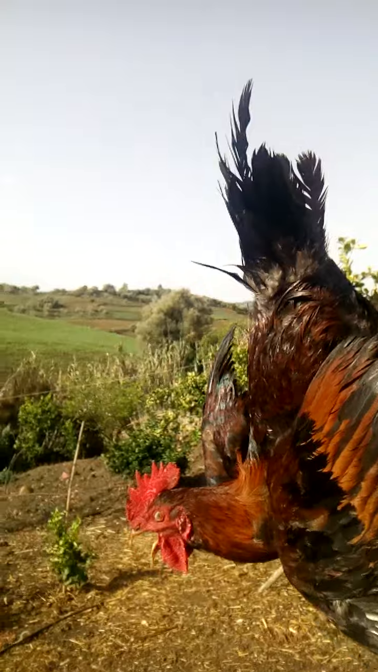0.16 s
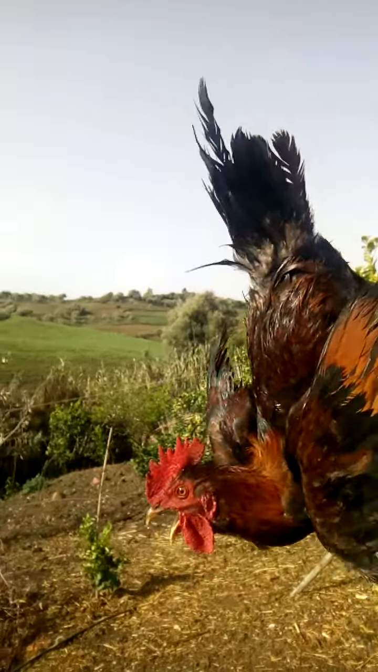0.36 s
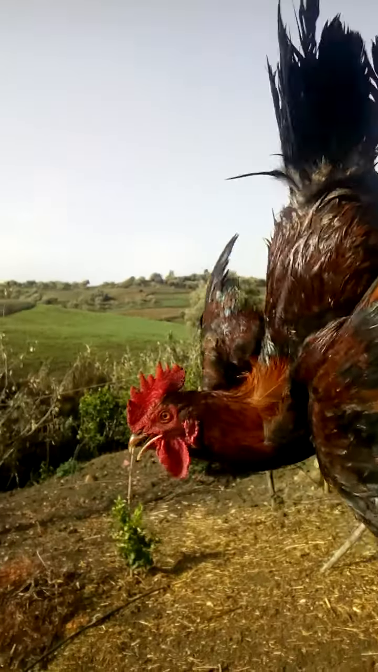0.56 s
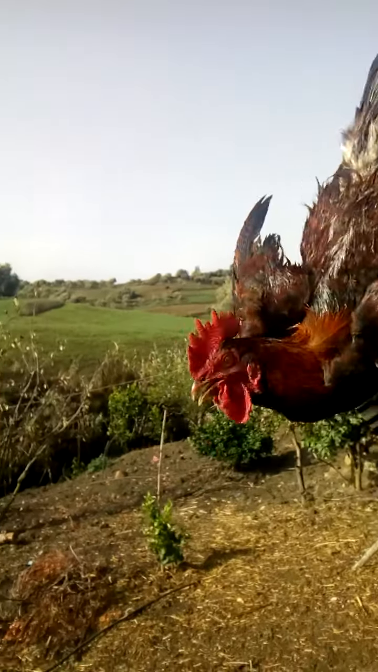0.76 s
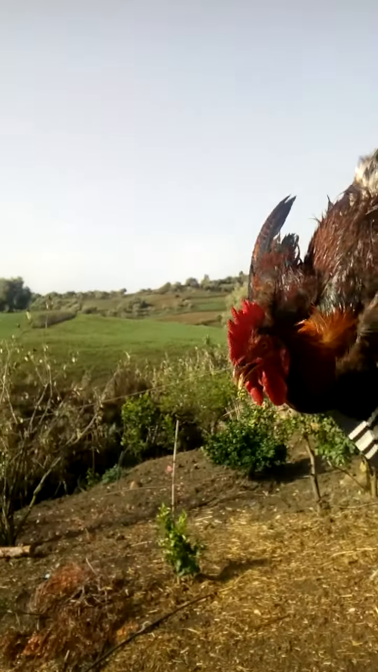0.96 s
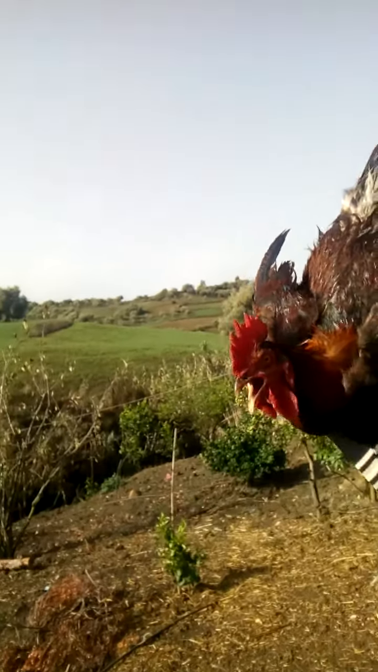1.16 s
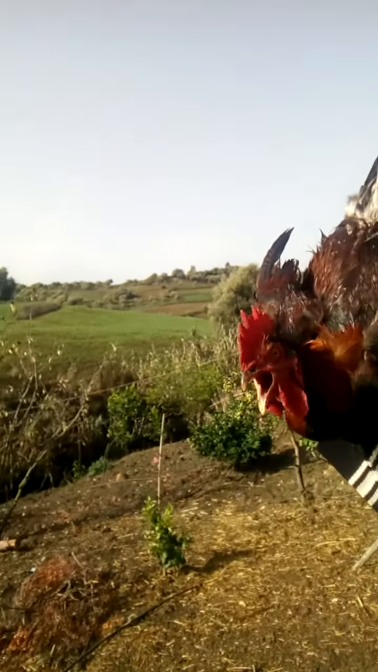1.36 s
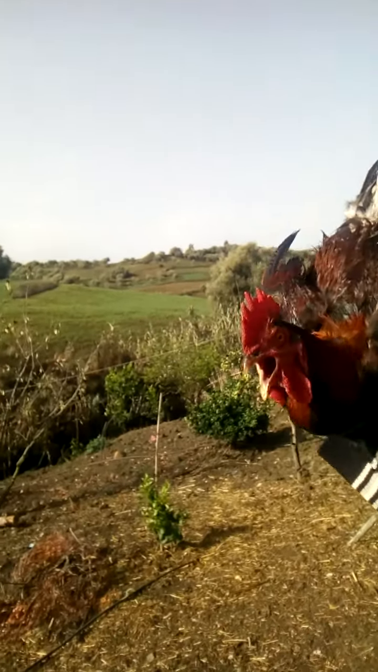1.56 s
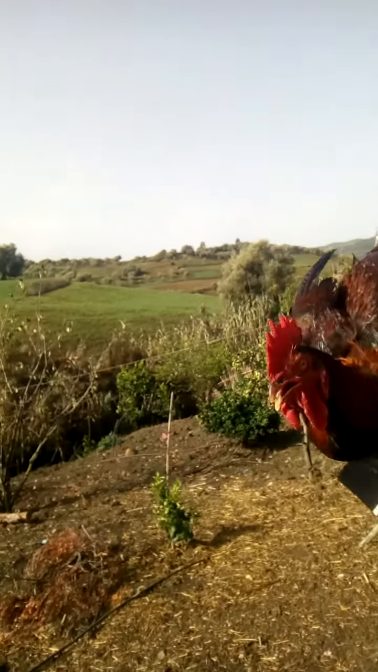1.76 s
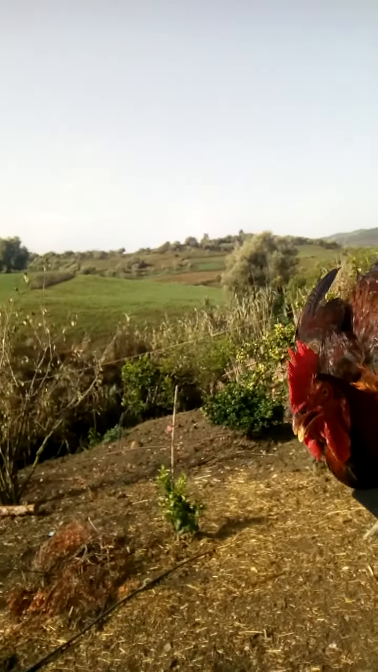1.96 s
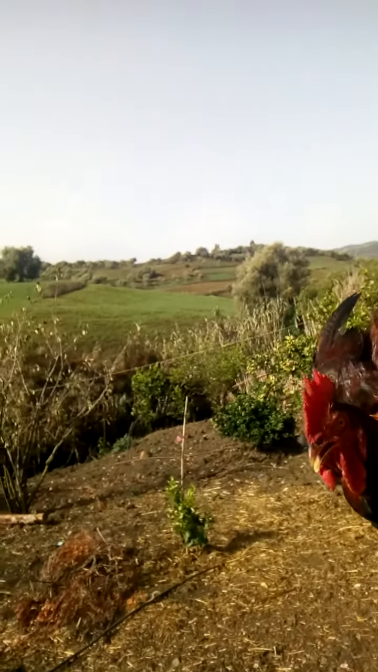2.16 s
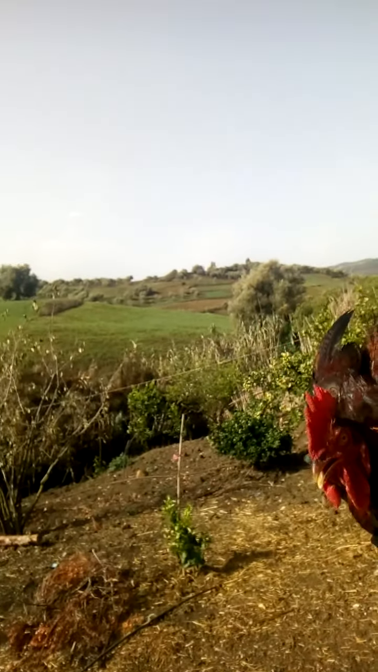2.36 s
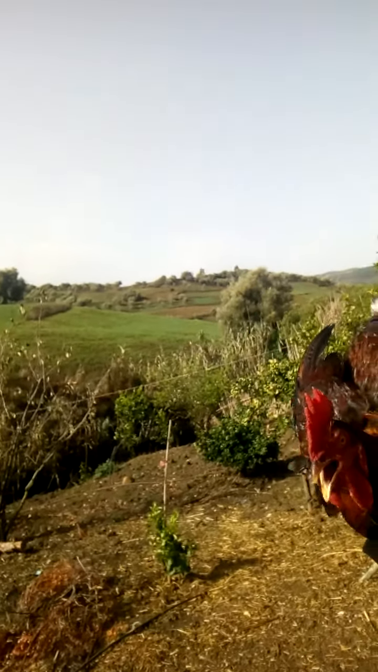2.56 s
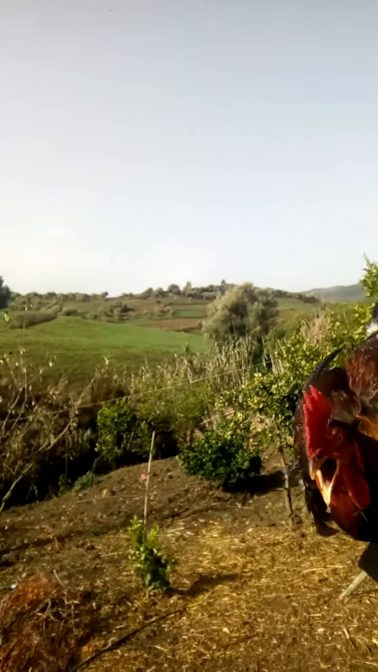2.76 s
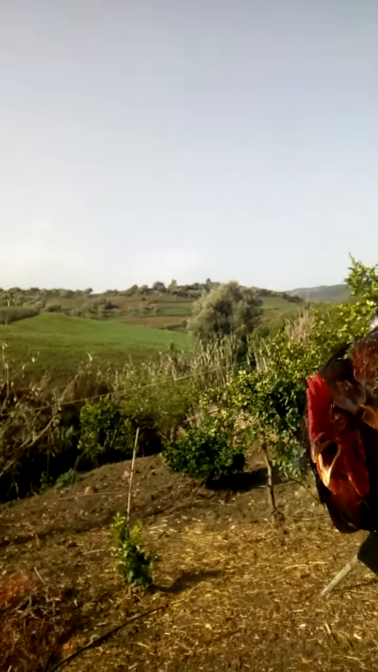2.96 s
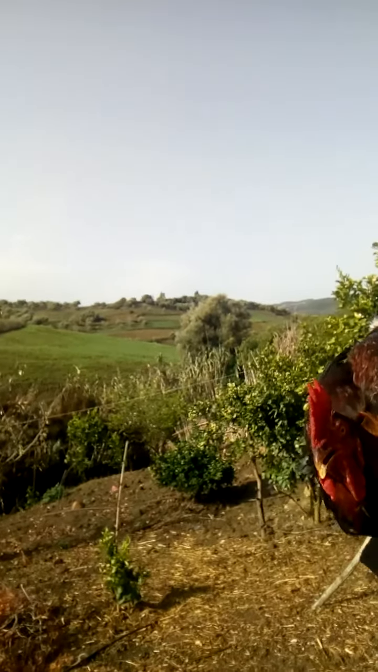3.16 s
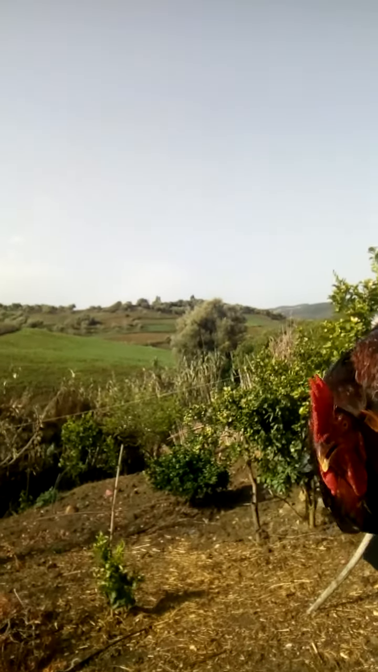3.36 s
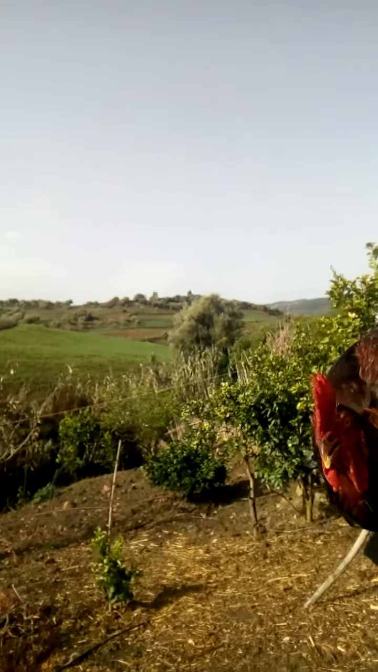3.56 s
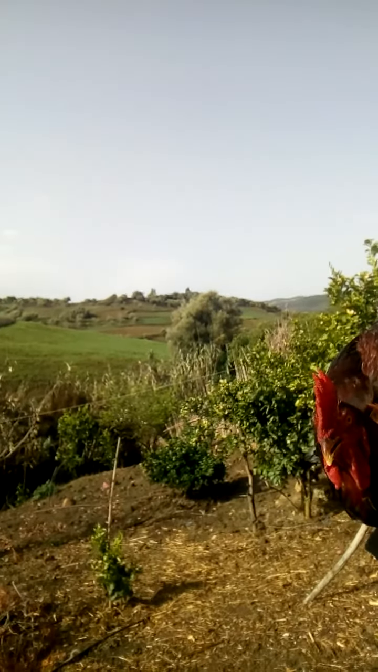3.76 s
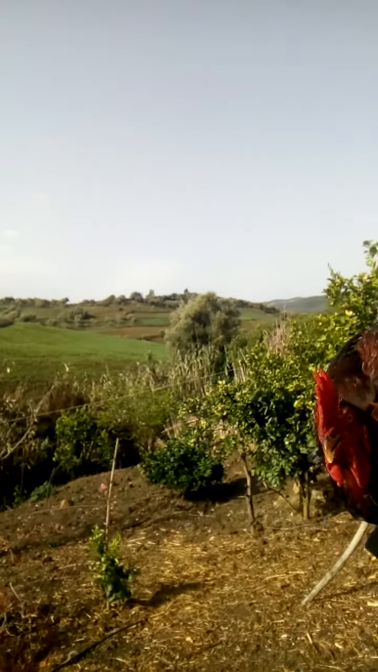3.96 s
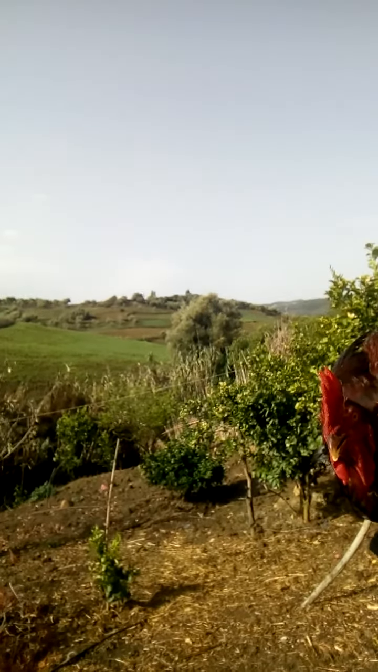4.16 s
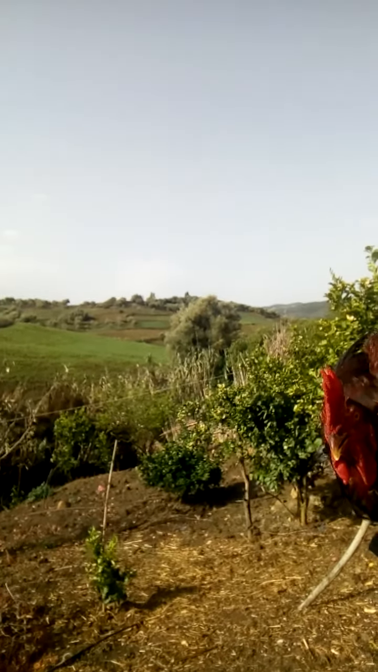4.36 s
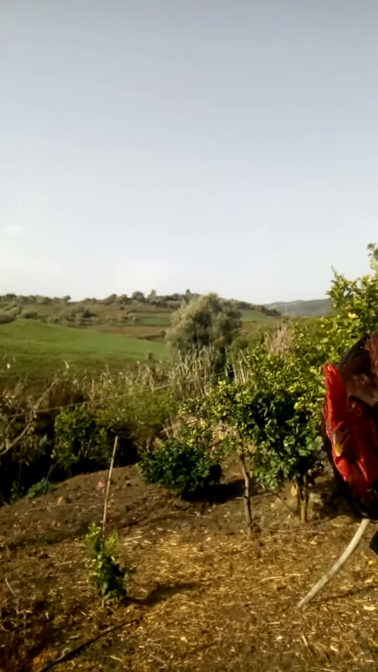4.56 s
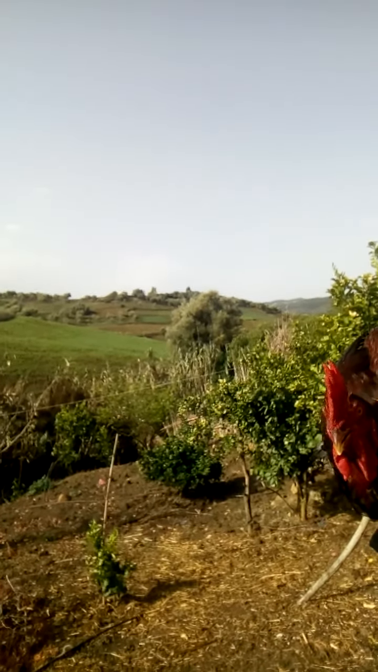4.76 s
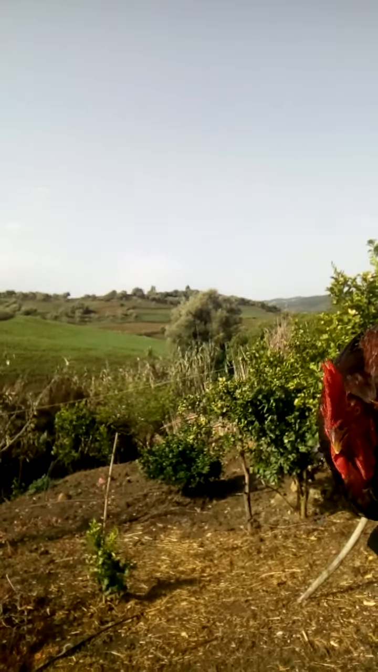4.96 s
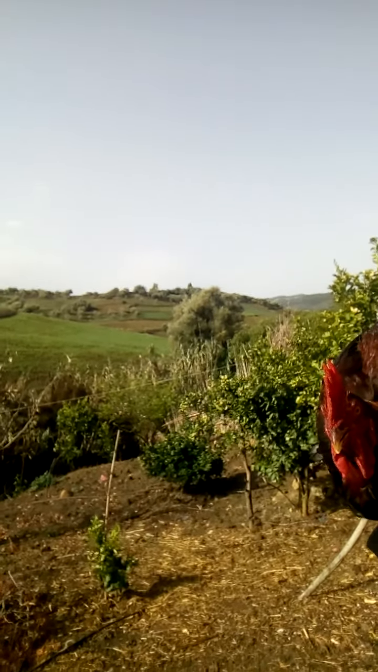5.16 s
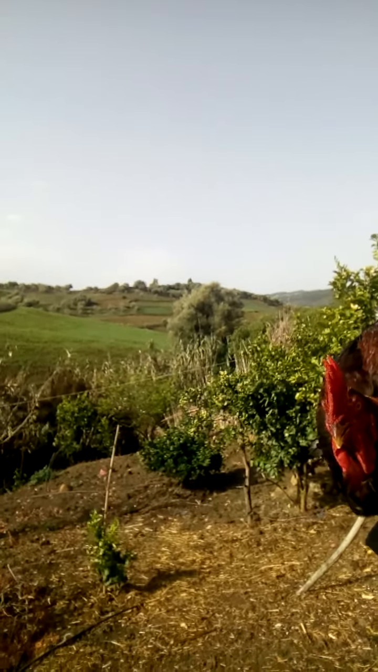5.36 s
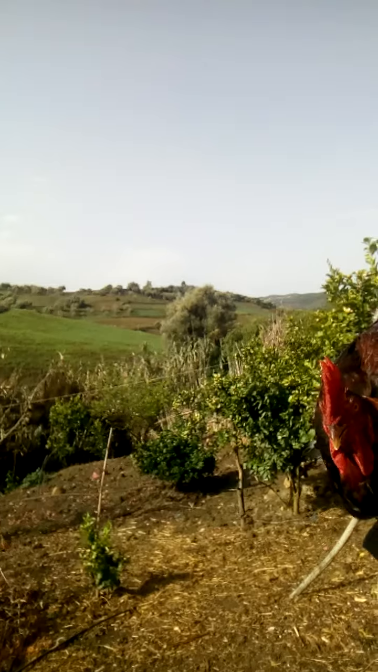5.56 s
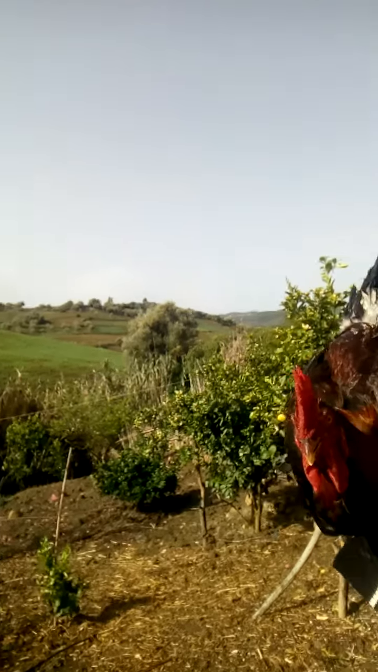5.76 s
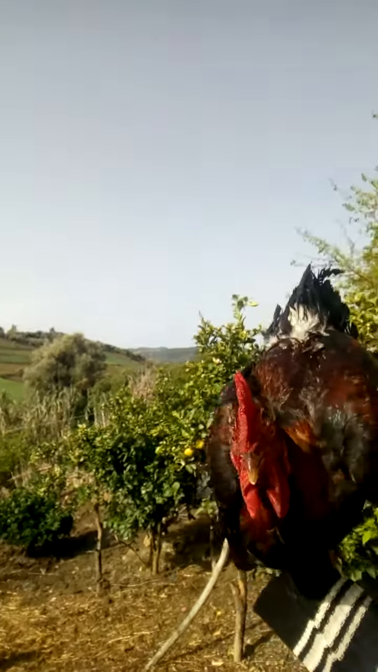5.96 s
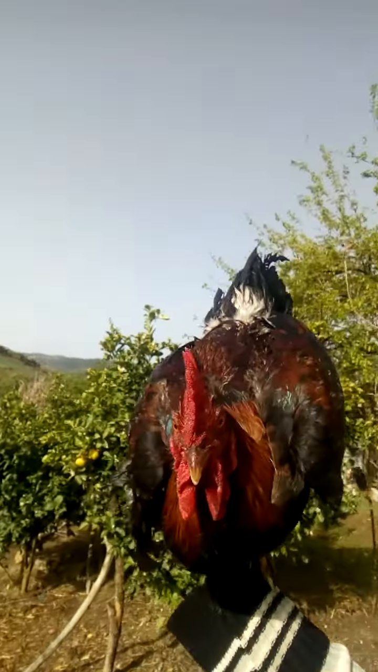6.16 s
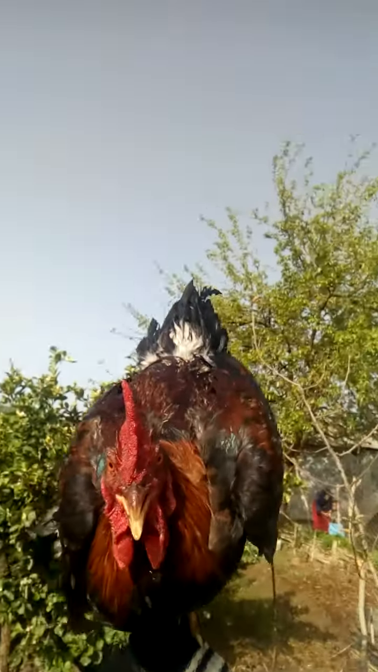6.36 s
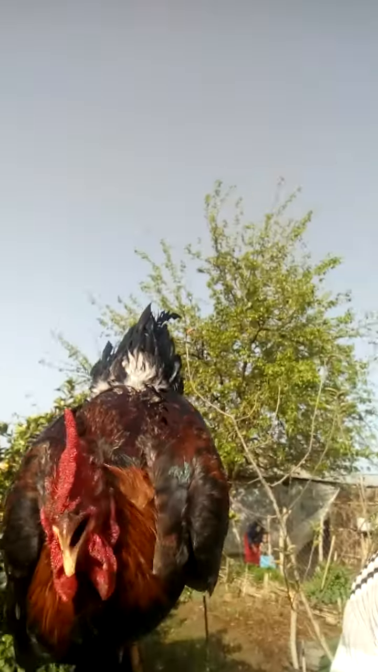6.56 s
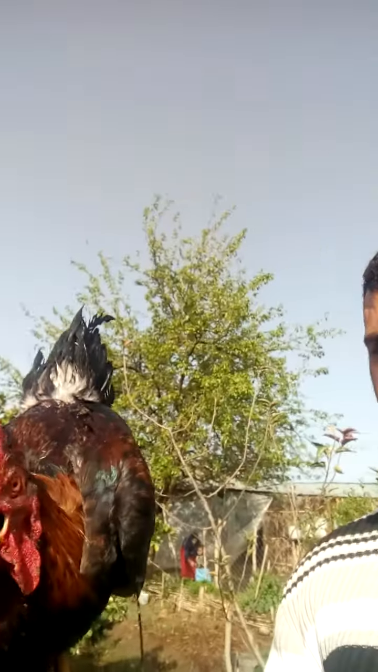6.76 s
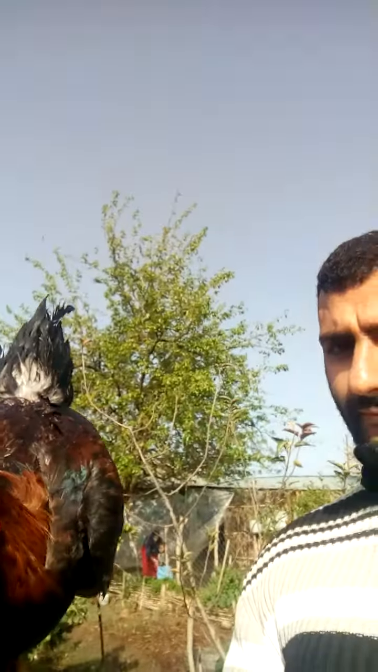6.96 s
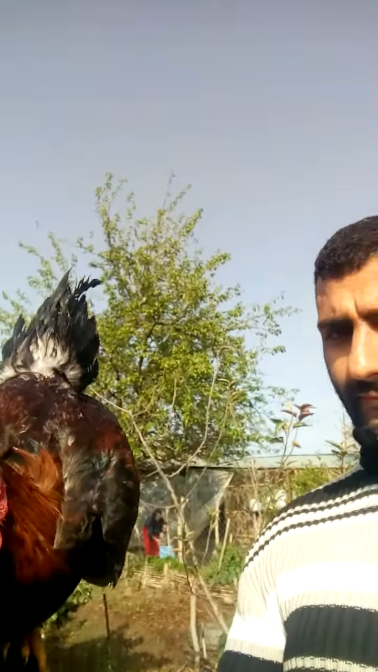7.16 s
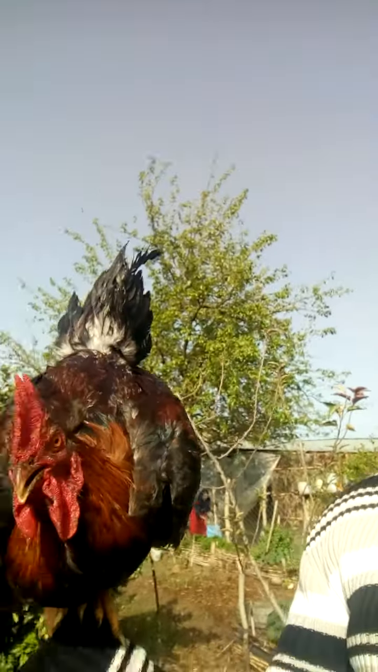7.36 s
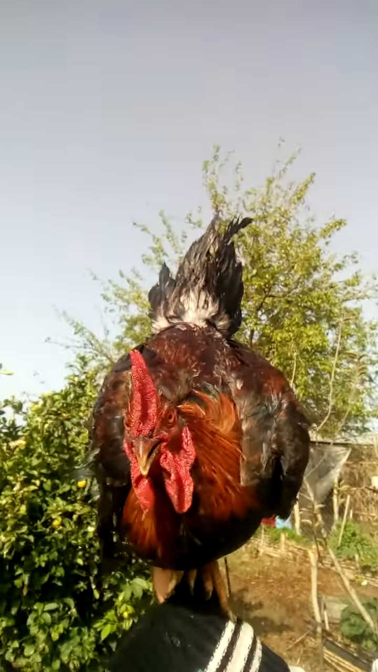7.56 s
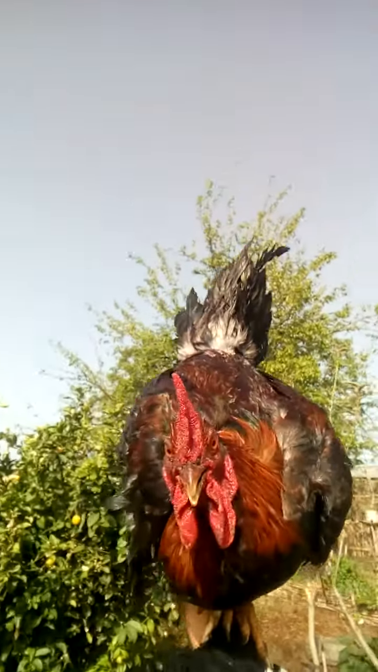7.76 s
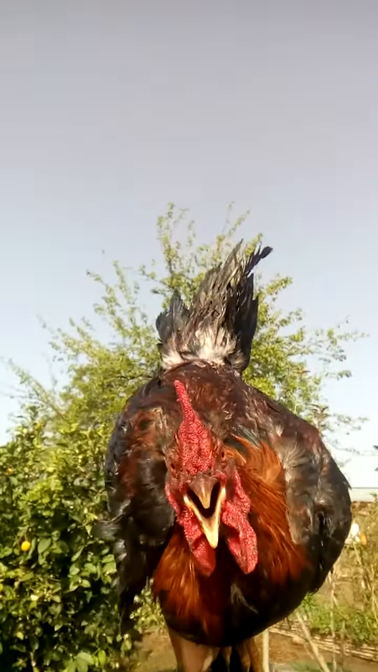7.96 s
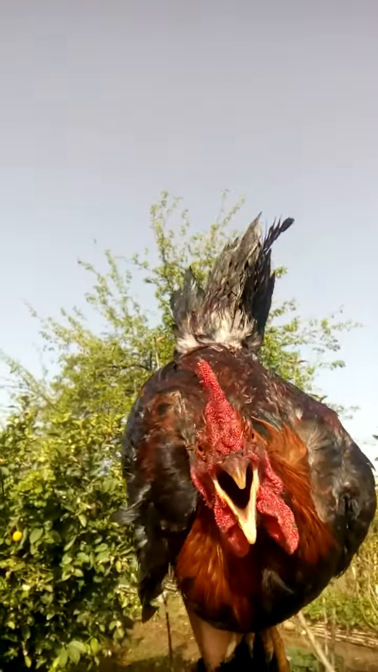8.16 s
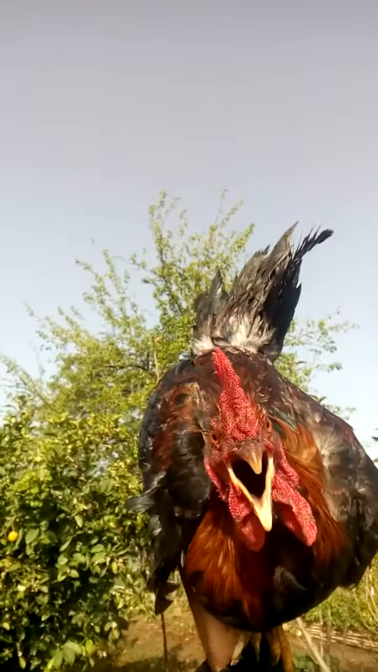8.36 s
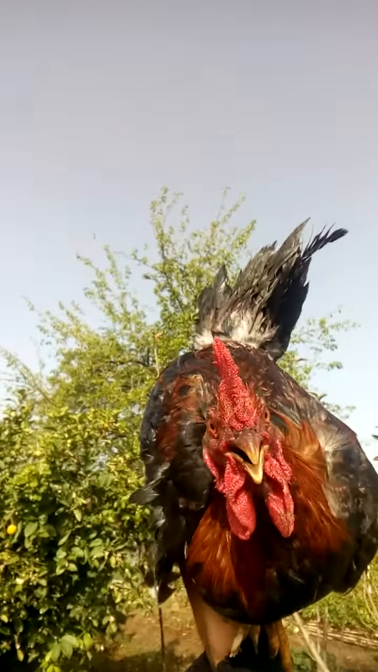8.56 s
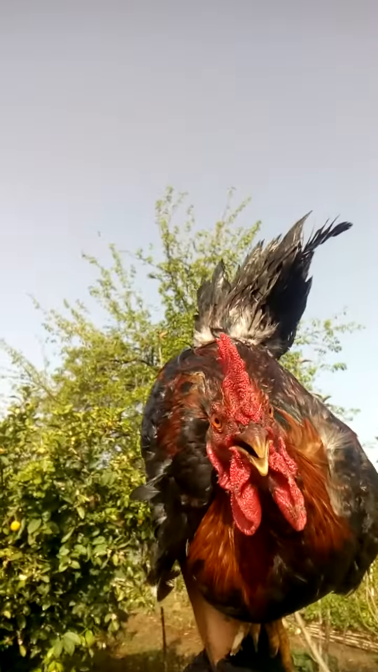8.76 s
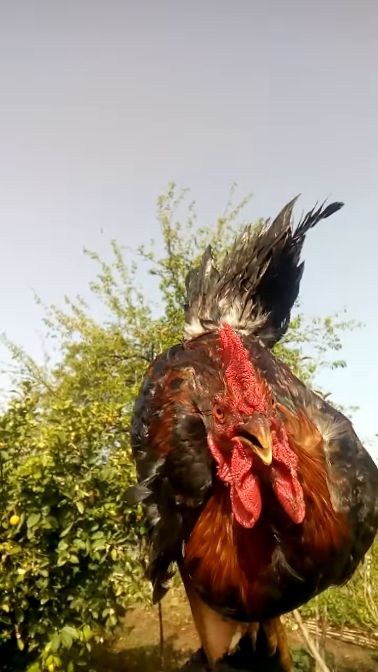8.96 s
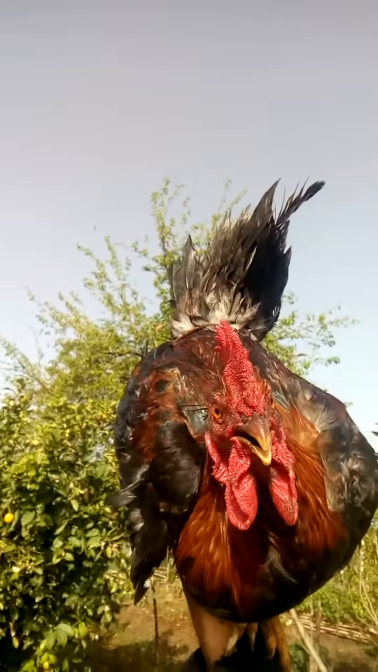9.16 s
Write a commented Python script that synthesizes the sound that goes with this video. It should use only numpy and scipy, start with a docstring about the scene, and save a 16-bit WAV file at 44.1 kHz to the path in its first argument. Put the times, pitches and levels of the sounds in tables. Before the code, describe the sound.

A rooster squawks loudly, close to the microphone, in quiet open country with almost no echo. Each squawk lasts about half a second, starting as a sputtering rasp, opening into a rough scream and settling on a clear note that sags into a croak. The first three come at the very start, at 1.1 and at 2.4 seconds. Soft gasps and faint feather rustles fall between calls, and a thin whine follows at 3.6 seconds. A small songbird twitters in the background on and off from 2.3 to 5.5 seconds. Another rooster crows very faintly far away from 4.5 to 5.8 seconds, followed by a light, dry double snap. The close rooster squawks again at 6.3 seconds, gasps, whines softly at 7.5, and gives a last squawk from 7.9 to 8.5 seconds. Faint outdoor air noise continues throughout.

```python
"""Open field: a rooster, held in a hand close by, squawks five times.
Membrane pulses drive throat, mouth and beak resonances; each squawk starts as a sputtering rasp,
opens into a rough scream, locks into a clear note and sags. Between squawks he gasps, whines softly
and rustles his feathers. Behind him: faint air noise, a twittering songbird, a distant crow from
another rooster and one dry double snap."""
import sys
import numpy as np
from scipy import signal
from scipy.fft import rfft, irfft, next_fast_len
from scipy.io import wavfile
from scipy.ndimage import uniform_filter1d, minimum_filter1d, map_coordinates

SR = 44100
rng = np.random.default_rng(int(sys.argv[2]) if len(sys.argv) > 2 else 0)


def to_wav(sig):
    """Store sig (one row per channel, or 1-D mono) as 16-bit WAV at the path in sys.argv[1].

    Samples outside -1..1 are clipped; the rate is SR.
    """
    pcm = np.clip(np.atleast_2d(sig), -1, 1) * 32767
    pcm = np.round(pcm).astype(np.int16)
    wavfile.write(sys.argv[1], SR, pcm.T)  # frames by channels


N = 410130
T = np.arange(N) / SR
GRID_HZ = np.fft.rfftfreq(4096, 1 / SR)
CROAK_ONSET_S = 0.017


def amp(db):
    """Decibels to gain."""
    return 10 ** (np.asarray(db) / 20)


def unit(x):
    """x at rms 1."""
    return x / np.sqrt(np.mean(x ** 2) + 1e-20)


def steady(x, window_s):
    """x with its running rms held at 1."""
    window = signal.windows.hann(int(window_s * SR) | 1)
    power = np.abs(signal.fftconvolve(x ** 2, window / window.sum(), "same"))
    return x / np.sqrt(power + 1e-4 * np.mean(x ** 2))


def along(points, hz):
    """Interpolate (f/Hz, value) points on a log frequency axis."""
    points_hz, values = np.transpose(points)
    return np.interp(np.log(hz + 1), np.log(points_hz), values)


def ramp(t, centre, width):
    """Smooth step from 0 to 1."""
    return .5 + .5 * np.sin(np.pi * np.clip((t - centre) / width, -.5, .5))


def bump(t, centre_s, half_s):
    """Gaussian of height 1."""
    return np.exp(-((t - centre_s) / half_s) ** 2)


def wobble(t, rate_hz):
    """Smooth random curve, rate_hz knots a second."""
    knot = (t - t[0]) * rate_hz
    return map_coordinates(rng.standard_normal(int(knot[-1]) + 4), [knot])


def resonances(modes):
    """Gain of steep-sided resonances: f/Hz, half width/Hz, level/dB."""
    return sum(amp(db) / (1 + ((GRID_HZ - hz) / width_hz) ** 2) for hz, width_hz, db in modes)


def colour(x, gain):
    """x through the minimum-phase filter with this gain."""
    cepstrum = irfft(np.log(np.maximum(gain, 1e-6)))
    half = len(cepstrum) // 2
    cepstrum[1:half] *= 2
    cepstrum[half + 1:] = 0
    return signal.fftconvolve(x, irfft(np.exp(rfft(cepstrum))))[:len(x)]


def noise(gain):
    """Coloured noise of rms 1."""
    return unit(colour(rng.standard_normal(N), gain))


def pulses(at, sizes, length):
    """Band-limited pulses at fractional sample positions."""
    index = np.floor(at)[:, None].astype(int) + np.arange(-7, 9)
    offset = index - at[:, None]
    shape = np.sinc(offset) * np.cos(np.pi * offset / 16) ** 2
    inside = (index >= 0) & (index < length)
    return np.bincount(index[inside], (sizes[:, None] * shape)[inside], length)


def ring(x, hz, width_hz):
    """x through a resonance that follows the curve hz."""
    carrier = np.exp(2j * np.pi * np.cumsum(hz) / SR)
    pole = np.exp(-2 * np.pi * width_hz / SR)
    return 2 * np.real(carrier * signal.lfilter([1 - pole], [1, -pole], x / carrier))


def allpass(x, hz, width_hz):
    """Delays sound near hz, which spreads each pulse."""
    pole = np.exp(-2 * np.pi * width_hz / SR)
    a = np.array([1, -2 * pole * np.cos(2 * np.pi * hz / SR), pole ** 2])
    return signal.lfilter(a[::-1], a, x)


def air(level_db=-65):
    """Faint, slightly wavering outdoor noise."""
    # spectrum: f/Hz, level/dB
    spectrum = [(15, -48.5), (25, -18), (137, -6), (291, -12), (333, -12), (812, -18.5), (881, -19),
                (1090, -21.5), (2260, -23.5), (5520, -18), (8050, -40.5), (15800, -36)]
    return amp(level_db + 1.1 * wobble(T, 11)) * noise(amp(along(spectrum, GRID_HZ)))


def field_echo(x, delay_s=0.0072):
    """Trees and walls scatter a thin tail back."""
    # tail decay: f/Hz, t60/s
    decay = [(200, 0.4), (1000, 0.33), (3200, 0.5), (5500, 0.26), (9000, 0.76)]
    # initial tail spectrum: f/Hz, level/dB
    spectrum = [(200, -5.5), (1000, 1.5), (2500, -7), (4000, -4.5), (5500, 4.5), (8000, -6), (15000, -15)]
    hz, t, bins = signal.stft(rng.standard_normal(SR), SR, nperseg=256)
    bins = bins * amp(along(spectrum, hz)[:, None] - 60 * t / along(decay, hz)[:, None])
    tail = signal.istft(bins, SR, nperseg=256)[1]
    return signal.fftconvolve(x, np.pad(tail / np.linalg.norm(tail), (int(delay_s * SR), 0)))[:N]


def foliage(x, decay_s=0.0078):
    """Leaves and ground smear a sound with many faint early reflections."""
    t = T[:SR // 10]
    scatter = rng.standard_normal(len(t)) * np.exp(-t / decay_s)
    return signal.fftconvolve(x, scatter / np.linalg.norm(scatter))[:N]


def far_crow(blur_hz=22, sag_hz_per_s=140, fade_db_per_s=9.5):
    """Only a distant rooster's strongest overtone arrives, blurred; each syllable sinks and fades."""
    # start/s, end/s, f/Hz, level/dB
    syllables = [(4.53, 4.61, 1660, -69), (4.67, 4.74, 1690, -68), (4.77, 5.82, 1818, -71.5)]
    out = np.zeros(N)
    for start_s, end_s, hz, db in syllables:
        age_s = np.clip(T - start_s, 0, end_s - start_s)
        phase = 2 * np.pi * np.cumsum(hz - sag_hz_per_s * age_s + blur_hz * wobble(T, 90)) / SR
        gate = ramp(T, start_s, 0.039) * (1 - ramp(T, end_s, 0.052))
        out += amp(db - fade_db_per_s * age_s + 2.2 * wobble(T, 44)) * gate * np.sin(phase)
    return out


def songbird(chip_period_s=.0634, chip_s=0.029):
    """Twitters and down-slurs; every note flicks to a turning pitch and slides away."""
    # a whistle, then chips: whistle/s, last chip/s, first chip f/Hz, whistle/dB, chip/dB
    twitters = [(2.276, 2.408, 5990, -61, -49.5), (3.654, 3.844, 6120, -47.5, -40.5),
                (5.073, 5.455, 6200, -63, -40)]
    # down-slurs: t/s, level/dB
    slurs = [(2.313, -46.5), (4.398, -42), (4.69, -63.5)]
    # note shapes: length/s, start/Hz, turn/Hz, end/Hz
    whistle = (0.018, 4400, 6900, 6780)
    slur = (0.057, 3600, 5550, 3000)
    lead_in = (.042, 4300, 4720, 5250)
    notes = []
    for at_s, last_s, first_hz, whistle_db, chip_db in twitters:
        notes.append((at_s, whistle_db, *whistle))
        for k in range(round((last_s - at_s) / chip_period_s)):
            hz = first_hz * (1 - 0.015 * k)
            db = chip_db - 1.2 * k + 3 * rng.standard_normal()
            notes.append((at_s + (k + 1) * chip_period_s, db, chip_s, .69 * hz, hz, .92 * hz))
    for at_s, db in slurs:
        notes += [(at_s - lead_in[0], db - 7.5, *lead_in), (at_s, db, *slur)]
    out = np.zeros(N)
    for at_s, db, length_s, start_hz, turn_hz, end_hz in notes:
        progress = np.arange(int(length_s * SR)) / (length_s * SR)
        flick_hz = (start_hz - turn_hz) * np.clip(1 - progress / 0.34, 0, 1) ** 2
        slide_hz = (end_hz - turn_hz) * ramp(progress, .6, 0.9)
        hz = (turn_hz + flick_hz + slide_hz) * (1 + 0.024 * wobble(progress * length_s, 900))
        note = amp(db) * np.sin(np.pi * progress) * np.sin(2 * np.pi * np.cumsum(hz) / SR)
        out[int(at_s * SR):][:len(note)] += note
    return out


def snaps(gain_db=-3, max_t60_s=.12):
    """Two dry cracks in quick succession."""
    # t/s, relative level/dB, t60 before the cap/s
    bursts = [(5.837, -30.5, 0.064), (5.855, -35.5, 0.41)]
    # f/Hz, level/dB
    spectrum = [(120, -44), (200, -10.5), (268, -11.5), (345, -46.5), (515, -23.5), (690, -26), (842, -25),
                (2850, -11), (3120, -6), (4100, -12), (5300, -0.5), (9140, -41), (15500, -44)]
    decay = sum(amp(db - 60 * np.abs(T - at_s) / min(t60_s, max_t60_s)) * (T >= at_s)
                for at_s, db, t60_s in bursts)
    return amp(gain_db) * decay * noise(amp(along(spectrum, GRID_HZ)))


def rustles():
    """Feathers slide over the hand."""
    # t/s, half length/s, level/dB
    slides = [(0.903, 0.097, -58.5), (2.075, 0.063, -60), (6.115, 0.022, -60.5), (7.141, 0.02, -56.5)]
    # f/Hz, level/dB
    spectrum = [(500, -32.5), (2500, -11), (3300, -3.5), (5500, 5.5), (6400, -2), (7500, -21), (15000, -33)]
    swell = sum(amp(db) * bump(T, at_s, half_s) for at_s, half_s, db in slides)
    return swell * unit(noise(amp(along(spectrum, GRID_HZ))) * amp(3 * wobble(T, 280)))


def gasps():
    """Quick gulps of air sound the rooster's windpipe."""
    # t/s, half length/s, level/dB, lowest resonance/Hz
    gulps = [(0.679, 0.023, -48.5, 896), (0.939, 0.027, -44, 863), (3.26, 0.021, -45, 863),
             (3.502, 0.024, -49.5, 874), (7.057, 0.023, -52.5, 850), (7.35, 0.02, -54, 781)]
    # modes: ratio to lowest resonance, half width/Hz, level/dB
    windpipe = [(1, 59.9, 3), (1.52, 79.7, -3.5), (2.04, 100.1, -6.5)]
    out = np.zeros(N)
    for at_s, half_s, db, hz in gulps:
        pipe = resonances([(hz * ratio, width_hz, mode_db) for ratio, width_hz, mode_db in windpipe])
        out += amp(db) * np.exp(-np.abs((T - at_s) / half_s) ** 3) * noise(pipe)
    return out


def whines(sag_s=0.032, fade_db_per_s=10.5, flutter_db=2):
    """A thin note through a nearly shut beak creeps up, then sags and roughens as the air runs out."""
    # start/s, end/s, start pitch/Hz, top pitch/Hz, level/dB
    notes = [(3.602, 3.895, 509.7, 556.6, -40), (7.5, 7.8, 498.3, 552, -43.5)]
    # one list per note: harmonic number, level/dB
    spectra = [
        [(1, -2.5), (2, 5.5), (3, -6.5), (4, -9.5), (5, -20), (6, -22.5), (7, -19.5), (8, -25), (9, -43),
         (10, -33), (11, -28), (12, -34)],
        [(1, -7.5), (2, 1), (3, -16.5), (4, -11.5), (5, -23.5), (6, -21), (7, -21.5), (8, -28.5), (9, -39),
         (10, -31), (11, -27.5), (12, -34)],
    ]
    out = np.zeros(N)
    for (start_s, end_s, start_hz, top_hz, db), harmonics in zip(notes, spectra):
        span = (T > start_s - .02) & (T < end_s + .08)
        t = T[span]
        risen = np.clip((t - start_s) / (end_s - sag_s - start_s), 0, 1) ** 0.6
        pitch_hz = (start_hz + (top_hz - start_hz) * risen) * (1 - 0.1 * ramp(t, end_s - .01, sag_s))
        spent = ramp(t, end_s - .005, 0.017)
        jitter = 0.0051 * wobble(t, 22) + (0.013 + 0.1155 * spent) * wobble(t, 500)
        phase = 2 * np.pi * np.cumsum(pitch_hz * (1 + jitter)) / SR
        tone = unit(sum(amp(harmonic_db + flutter_db * wobble(t, 22) * (k > 2)) * np.sin(k * phase)
                        for k, harmonic_db in harmonics))
        shimmer_db = (.5 + 3 * spent) * wobble(t, 250)
        fade_db = fade_db_per_s * (t - start_s) + 360 * np.maximum(t - end_s + 0.009, 0)
        out[span] = tone * amp(db + shimmer_db - fade_db) * ramp(t, start_s, .01)
    return out


def voice_cracks(width_hz=220):
    """The membranes slip for a cycle and knock the throat's upper resonance."""
    # t/s, half length/s, level/dB, f/Hz
    slips = [(1.564, 0.0022, -16.5, 2742), (1.61, .002, -25, 3004)]
    return sum(amp(db) * bump(T, at_s, half_s) * steady(noise(resonances([(hz, width_hz, 0)])), .01)
               for at_s, half_s, db, hz in slips)


def gesture(t, stages, effort, croak, lock_s=.045, spent_hz=482.4, flutter_hz=39):
    """Pitch, level, brightness: pressure builds, the beak opens, the note holds, the air runs out."""
    start_s, open_s, locks_s, _, sags_s, breaks_s, _ = stages
    held_hz, rasp_db, peak_db, rasp_bright_db, note_bright_db = effort
    held = np.clip((t - locks_s) / (sags_s - locks_s), 0, 1)
    spent = np.clip((t - sags_s) / (breaks_s - sags_s), 0, 1)
    rough = 1 - ramp(t, locks_s - lock_s / 4, lock_s)
    # the scream lies flat, the note arches and sinks, the croak flips up
    pitch_hz = held_hz * (1 - .085 * rough - .016 * (2 * held - 1) ** 2)
    pitch_hz += (spent_hz - pitch_hz) * spent ** 1.4
    pitch_hz *= 1 + 0.067 * croak
    level_db = rasp_db + (peak_db - rasp_db) * held - 1.5 * spent + 3.5 * croak
    level_db += rough * wobble(t, flutter_hz)
    onset = np.exp(-np.abs(t - start_s) / 0.024)
    opening = ramp(t, open_s - 0.014, 0.66)
    shutting = ramp(t, breaks_s + CROAK_ONSET_S / 2, .04)
    bright_db = rasp_bright_db + (note_bright_db - rasp_bright_db) * opening
    bright_db -= 0.5 * onset + 1.76 * held + 10.5 * shutting
    bright_db += 1.77 * rough * wobble(t, flutter_hz)
    pitch_hz *= 1 + 0.0015 * wobble(t, 70) + .0018 * wobble(t, 25)
    return pitch_hz, level_db, bright_db


def syrinx(t, pitch_hz, chaos, sputter, doubling, scatter_db=4.5, hiss=0.15):
    """One membrane slap a cycle: uneven in chaos and sputter, alternating when the period doubles."""
    cycles = np.cumsum(pitch_hz) / SR
    k = np.arange(1, int(cycles[-1]))
    at = np.interp(k, cycles, np.arange(len(t)))
    i = at.astype(int)
    timing, strength = rng.standard_normal((len(k), 2)).T
    alternation = (-1) ** k * doubling[i]
    jitter = 0.0015 + .12 * chaos[i] + .22 * sputter[i]
    at += SR / pitch_hz[i] * (timing * jitter + .035 * alternation)
    size_db = np.clip(strength, -2, 1.5) * scatter_db * (chaos[i] + sputter[i])
    slaps = pulses(at, amp(size_db) * (1 + 0.22 * alternation), len(t))
    turbulence = (.01 + chaos) * rng.standard_normal(len(t)) * np.sin(np.pi * cycles) ** 2
    return slaps + hiss * turbulence


def voice_colour(source, slack, locked, windpipe_hz, head):
    """Throat, mouth and beak resonances shift from rasp to scream to note; a faint sizzle lies on top."""
    # f/Hz, half width/Hz, rasp/dB, scream/dB, note/dB
    peaks = [(455.5, 83, -17.5, -25.5, -43.5), (700, 36, -14, -25, -26.5), (815, 61, -15, 1, -26.5),
             (1020, 230, -9, -19.5, 8.5), (1230, 240, -1.5, 4.5, -21.5), (1610, 200, -27, -15.5, -11),
             (2096, 160, -8.5, -5, -1.5), (2897, 240, -11.5, -10.5, -4.5), (4870, 820, -33.5, -24.5, -16),
             (9900, 1500, -62.5, -53, -38.5), (15300, 380, -57.5, -43, -39)]
    throat = peaks[:-2]
    top_ring = peaks[-2:]  # faint high sizzle and a thin ring near 15 kHz on loud squawks
    # resonance levels before the pose's gain: rasp/dB, scream/dB, note/dB
    mouth = (-17, -12.5, -12.5)
    beak = (-21.5, -16, -14.5)
    # radiation from the head: f/Hz, level/dB
    radiation = [(15, -27), (45, -9), (170, -9.5), (260, 0), (380, -2.5), (480, 0), (3450, 5), (3950, -2.5),
                 (4600, 5), (6500, 4), (8000, -3), (10000, -6.5), (15000, 3.5)]
    beak_hz, beak_width_hz, beak_db, mouth_hz, mouth_db = head
    modes = np.array([*throat, *top_ring, (mouth_hz, 190, *np.add(mouth, mouth_db)),
                      (beak_hz, beak_width_hz, *np.add(beak, beak_db))])
    hz, width_hz, *stage_db = modes.T
    radiated = amp(along(radiation, GRID_HZ))
    shares = [slack, (1 - slack) * (1 - locked), (1 - slack) * locked]
    rasp, scream, note = (colour(source * share, resonances(zip(hz, width_hz, db)) * radiated)
                          for share, db in zip(shares, stage_db))
    # sparse slaps leave the windpipe ringing, also about an octave below its resonance
    upper = ring(rasp, windpipe_hz, width_hz=14)
    lower = ring(rasp, windpipe_hz * .53, width_hz=10)
    rasp = rasp + np.std(rasp) * (amp(0.5) * unit(upper) + amp(-9) * unit(lower))
    note = allpass(note, hz=2880, width_hz=180)
    return rasp + allpass(scream + note, hz=1670, width_hz=310)


def beak_balance(voice, bright_db, split_hz=1550):
    """A wider beak lets out more treble: the upper band is set bright_db above the lower."""
    low = signal.sosfiltfilt(signal.butter(6, split_hz, fs=SR, output="sos"), voice)
    return steady(low, 0.021) + amp(bright_db) * steady(voice - low, 0.03)


def squawk(stages, effort, pose, stretch_s=.085, attack_db_per_s=3400, release_db_per_s=2300):
    """Rising pressure takes the voice from rasp to scream to a clear note, which ends in a croak."""
    # the voice catches: t/s, half length/s, depth/dB
    catches = [(1.16, 0.0086, 10), (2.497, .007, 21), (6.381, 0.0077, 5.5), (6.401, 0.01, 23.5),
               (6.47, 0.007, 34), (6.6, 0.011, 11), (7.923, 0.011, 18), (8.508, 0.0056, 17.5)]
    start_s, open_s, locks_s, clear_s, _, breaks_s, end_s = stages
    *head, echo_db, rest_hz, stretched_hz = pose
    span = (T > start_s - .05) & (T < end_s + .05)
    t = T[span]
    croak = ramp(t, breaks_s + CROAK_ONSET_S / 2, CROAK_ONSET_S)
    pitch_hz, level_db, bright_db = gesture(t, stages, effort, croak)
    # the resonance climbs as the neck stretches and falls back at the lock
    windpipe_hz = stretched_hz + (rest_hz - stretched_hz) * np.exp(-np.maximum(t - start_s, 0) / stretch_s)
    windpipe_hz *= (1 - .12 * ramp(t, locks_s - .03, .1)) * (1 + 0.0051 * wobble(t, 60))
    sputter = 1 - ramp(t, open_s - .025, .22)
    slack = sputter + .5 * croak
    locked = ramp(t, locks_s - .003, 0.046) * (1 - 0.39 * croak)
    doubling = (1 - slack) * (1 - ramp(t, clear_s - .008, 0.042))
    source = syrinx(t, pitch_hz, 1 - locked, sputter, doubling)
    voice = voice_colour(source, slack, locked, windpipe_hz, head)
    voice = beak_balance(voice, bright_db - 12 * ramp(t, breaks_s + CROAK_ONSET_S, 0.012))
    catch_db = sum(depth_db * bump(t, at_s, half_s) for at_s, half_s, depth_db in catches)
    attack_db = attack_db_per_s * np.maximum(start_s - t, 0)
    release_db = release_db_per_s * np.maximum(t - end_s + 0.0059, 0)
    out = np.zeros(N)
    out[span] = voice * amp(level_db - catch_db - attack_db - release_db)
    return out + amp(echo_db) * field_echo(out)


def squawks():
    """Five squawks, each with its own timing, drive and head pose."""
    # start/s, beak open/s, pitch locks/s, clear from/s, sags from/s, breaks up/s, end/s
    stages = [(0, .22, .352, .40, .378, .426, .446), (1.111, 1.35, 1.44, 1.475, 1.582, 1.635, 1.654),
              (2.447, 2.68, 2.775, 2.795, 2.957, 3.003, 3.021),
              (6.337, 6.70, 6.82, 6.85, 6.896, 6.934, 6.953),
              (7.864, 8.08, 8.188, 8.203, 8.408, 8.492, 8.521)]
    # held pitch/Hz, low-band rasp/dB, low-band peak/dB, rasp brightness/dB, note brightness/dB
    efforts = [(570.6, -18.5, -15, -13.5, 2.5), (562.6, -18.5, -17.5, -6.5, 6),
               (547.7, -18, -15.5, -8, 4.5), (559.7, -17.5, -15.5, -10.5, 3.5),
               (585, -17.5, -14.5, -6.5, 4.5)]
    # beak f/Hz, beak half width/Hz, beak gain/dB, mouth f/Hz, mouth gain/dB, echo/dB,
    # windpipe at rest/Hz, windpipe stretched/Hz
    poses = [ (5480, 600, -3.5, 3200, 0.5, -28, 1170, 1265), (5570, 400, -7, 3200, -7, -26, 1180, 1320),
             (5370, 530, 1, 3150, -6.5, -28, 960, 1290), (6563, 1100, -4.5, 3280, 5, -30.5, 840, 1280),
             (5780, 410, 1.5, 3380, 4.5, -30, 1120, 1335), ]
    return sum(squawk(*rows) for rows in zip(stages, efforts, poses))


def scene():
    """Nearly dry squawks over softer sounds with more echo; both channels are the same."""
    rooster = squawks()
    soft = whines() + gasps() + rustles()
    bird, snap = songbird(), snaps()
    background = bird + amp(-2.5) * foliage(bird) + snap + air()
    echo = field_echo(amp(-12.5) * soft + amp(-12) * bird + amp(-10) * snap)
    mono = rooster + voice_cracks() + soft + background + far_crow() + echo
    return np.array([mono, mono])


def record(dry, ceiling=.82, top_hz=15800):
    """Peak limiter, then a brick-wall low-pass."""
    needed = np.minimum(1, ceiling / (np.abs(dry[0]) + 1e-9))
    held = minimum_filter1d(needed, size=131)
    gain = uniform_filter1d(uniform_filter1d(held, size=65), size=65)
    size = next_fast_len(N + SR)
    passband = np.fft.rfftfreq(size, 1 / SR) < top_hz
    return irfft(rfft(dry * gain, size) * passband, size)[:, :N]


dry = scene()
out = record(dry)
to_wav(out)
```